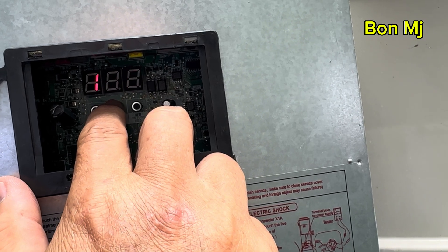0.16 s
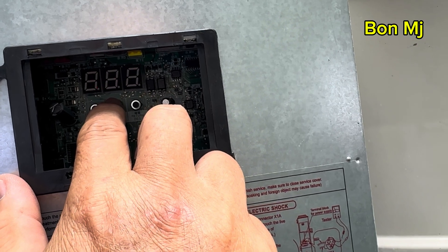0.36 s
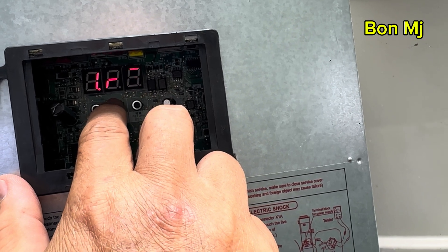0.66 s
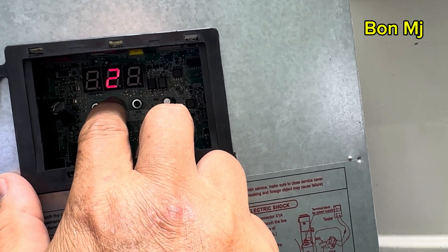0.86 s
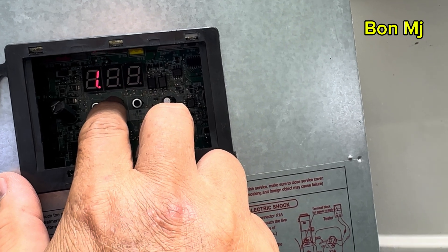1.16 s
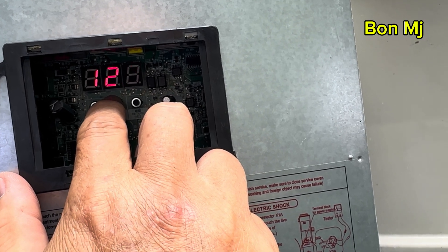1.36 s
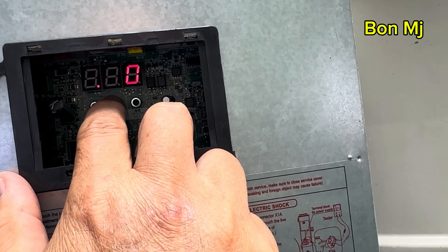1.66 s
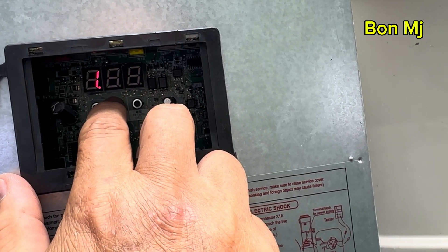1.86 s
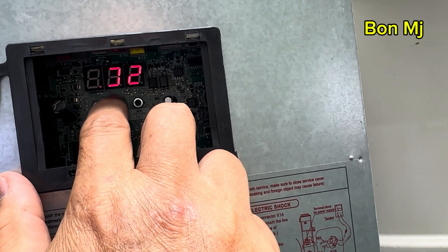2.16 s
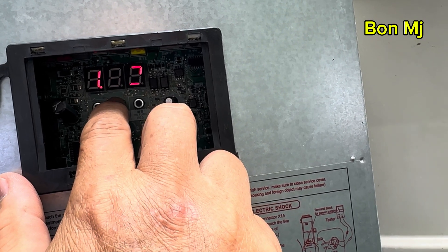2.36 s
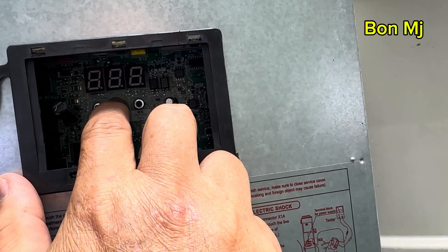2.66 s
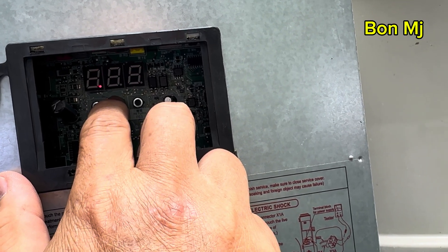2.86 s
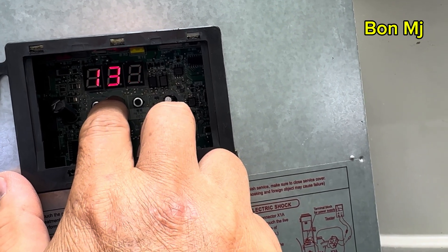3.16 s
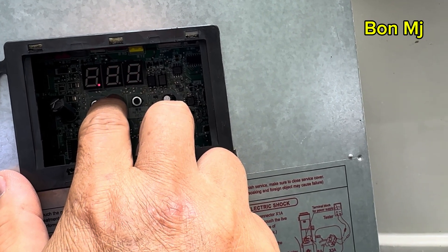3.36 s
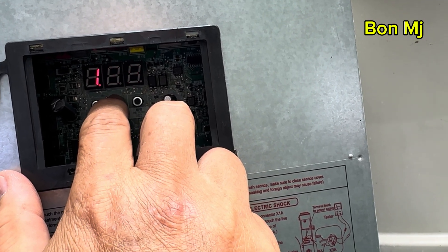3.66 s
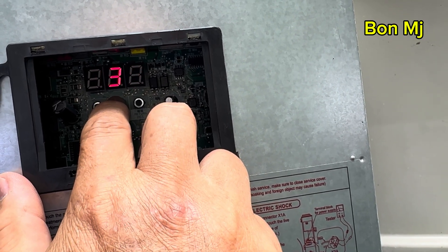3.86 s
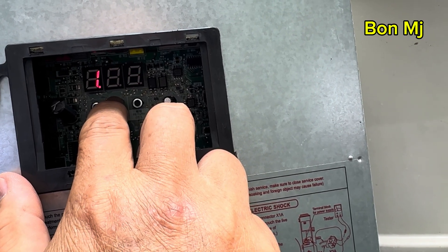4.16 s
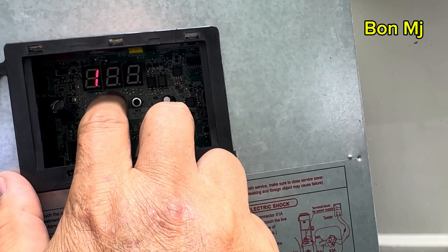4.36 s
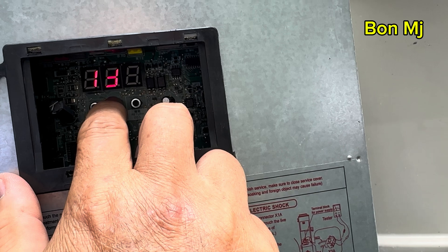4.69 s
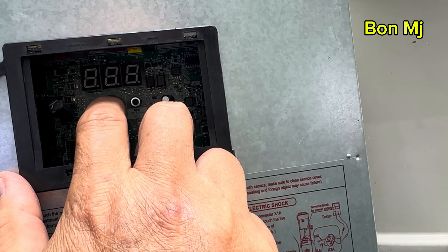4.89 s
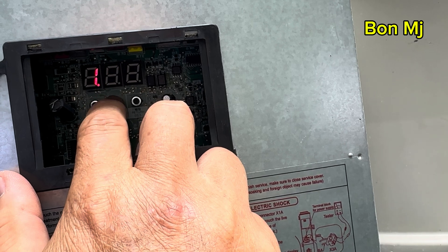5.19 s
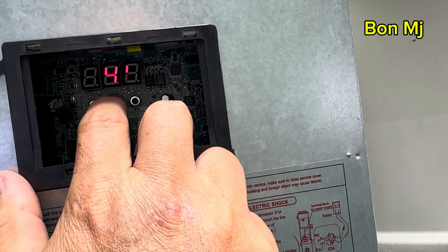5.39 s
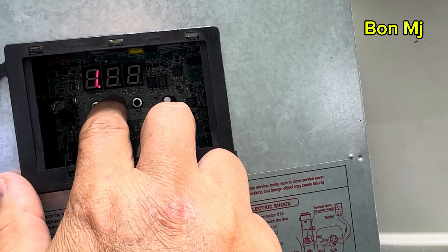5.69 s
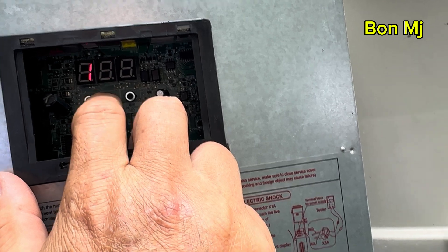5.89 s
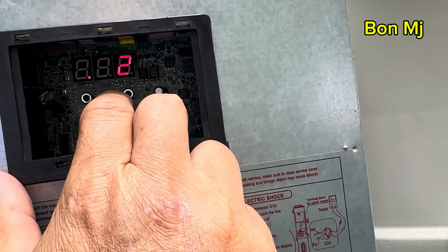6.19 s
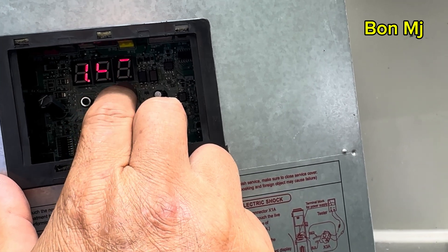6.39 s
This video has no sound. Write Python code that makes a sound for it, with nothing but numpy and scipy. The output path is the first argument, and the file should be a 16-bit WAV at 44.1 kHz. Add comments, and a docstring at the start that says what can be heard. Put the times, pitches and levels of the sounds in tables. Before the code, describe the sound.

Outdoors, close beside the metal casing of a large air conditioner, a deep compressor drone and low rush of air run without pause. From about one second the fan's blade tone swells in three long pulsing throbs, the last held to the end. Very faintly on top, an inverter whines and thin whistles slide downward again and again. Soft low thumps come near two and six seconds.

```python
"""Outdoors, a stereo pair of microphones stands close to the sheet-metal side of a large air conditioner.
From the first moment filtered noise makes the rush of air, and summed sines the fan, hums and compressors.
An inverter whines very high in a band of hiss, over a faint choke; thin whistles already slide down, and
return again and again between puffs of fine hiss. From about 1.2 s the blade tone swells in three long
throbs, the last held to the end; near 2 s and again near 6 s comes a soft low thump."""
import sys
import numpy as np
from scipy import signal
from scipy.fft import rfft, irfft
from scipy.io import wavfile

SR = 44100
rng = np.random.default_rng(int(sys.argv[2]) if len(sys.argv) > 2 else 0)


def inscribe(sig):
    """Save sig as 16-bit PCM at rate SR to the path in sys.argv[1].

    A 1-D sig is mono; a 2-D sig holds one channel per row.
    Samples are clipped to [-1, 1] before scaling.
    """
    pcm = np.round(np.clip(np.atleast_2d(sig).T, -1, 1) * 32767)
    wavfile.write(sys.argv[1], SR, pcm.astype(np.int16))


N = 288414
TIME = np.arange(N) / SR  # seconds
FREQS = np.maximum(np.fft.rfftfreq(N, 1 / SR), 1)  # Hz, kept above zero for the logarithms


def from_db(db):
    """Decibels to amplitude gain."""
    return np.exp(np.asarray(db) * (np.log(10) / 20))


def over_hz(points):
    """A spectrum's points joined on a log-frequency axis."""
    hz, value = np.transpose(points)
    return np.interp(np.log(FREQS), np.log(hz), value)


def white():
    """Spectrum of white noise with unit power per Hz."""
    return rfft(rng.standard_normal(N)) * np.sqrt(SR / 2)


def drift(rate, at=TIME):
    """Random wander of spread about 1, with `rate` new values a second, read at the given times."""
    knots = rng.standard_normal(1024)
    wander = np.interp(at * rate, np.arange(len(knots)), knots)
    return wander * np.sqrt(3 / 2)  # joining the knots by lines had shrunk the spread


def panned(left, right, side_db):
    """A stereo pair with the left raised by side_db, at equal total power."""
    ratio = from_db(side_db)
    return np.array([left * ratio, right]) * np.sqrt(2 / (1 + ratio ** 2))


def turning(hz):
    """Angle in radians of something that turns at this rate, from a random start."""
    return 2 * np.pi * (np.cumsum(hz * np.ones(N)) / SR + rng.random())


def tone(angle, db, side_db, lead):
    """A stereo sine of nominal rms level db; the right microphone leads by `lead` radians."""
    angle = np.float32(angle % (2 * np.pi) + 2 * np.pi * rng.random())
    # every tone is trimmed by about a decibel, the left a little more
    mics = np.float32(np.sqrt(2) * panned(0.84, 0.92, side_db))[:, None]
    return mics * np.float32(from_db(db)) * np.sin(angle + np.float32([[0], [lead]]))


def swell(start, length, edge_s):
    """Gain that rises, holds and falls in straight lines."""
    return np.clip(np.minimum(TIME - start, start + length - TIME) / edge_s, 0, 1)


# The rush of air before the cabinet colours it. Each row: frequency in Hz, level in dB per Hz.
AIR_SPECTRUM = [(18, -72), (32, -60.5), (46, -46.5), (72, -44), (125, -51.5), (340, -57), (640, -62),
                (1150, -71.5), (1600, -78.5), (2500, -85.5), (5000, -91), (6400, -96), (8600, -92.5),
                (9300, -114), (14500, -132)]
# Cabinet resonances that colour the rush. Each row: frequency in Hz, width in Hz, rise in dB.
CABINET_RESONANCES = [(397, 38, 1.5), (447, 34, -1.5), (575, 97, 3.5), (789, 63, 3), (975, 136, 4),
                      (1382, 150, 3.5), (2004, 560, 5), (3260, 480, 3), (4000, 150, 4), (5900, 300, 3.5)]
# How alike the rush is at the two microphones. Each row: frequency in Hz, likeness 0-1.
MIC_LIKENESS = [(30, 1), (100, 0.75), (340, 0.99), (410, 0.67), (495, 0.077), (580, 0.53), (690, .18),
                (800, 0.56), (870, 0.25), (1100, 0.87), (1320, .35), (1480, 0.51), (2100, .62),
                (2260, 0.23), (2600, 0.6), (4200, 0.62), (5900, 0.24), (6500, 1), (9000, 0.28)]
# Balance of the rush. Each row: frequency in Hz, left over right in dB.
MIC_BALANCE = [(40, 4.5), (80, -3), (260, -2), (420, -1.2), (780, -7), (960, -5), (1150, -0.5), (1450, -4),
               (5400, -5.5), (6800, 0)]
# Phase of the rush. Each row: frequency in Hz, lead of the right microphone in radians.
MIC_LEAD = [(45, 1.2), (90, -0.14), (390, 0.13), (480, 1.27), (580, .6), (690, 1.5), (760, -0.55),
            (950, -0.84), (1060, 1.02), (1200, 1.83), (1550, 0.5), (2100, 0.25), (2500, -1.3), (3000, 0.63),
            (4200, 1), (5300, .5), (5900, -0.6), (6500, 1)]


def air(rumble_hz=170, flutter_db=0.29):
    """Turbulent air coloured by the cabinet; its low rumble swells and sinks, the rest flutters slightly."""
    level_db = over_hz(AIR_SPECTRUM)
    for hz, width, rise_db in CABINET_RESONANCES:
        level_db = level_db + rise_db / (1 + (2 * (FREQS - hz) / width) ** 2)
    alike = np.clip(over_hz(MIC_LIKENESS), 0, 1)
    left = white()
    right = alike * left + np.sqrt(1 - alike ** 2) * white()
    right = right * np.exp(1j * over_hz(MIC_LEAD))
    rush = from_db(level_db) * panned(left, right, over_hz(MIC_BALANCE))
    low = 1 / (1 + (FREQS / rumble_hz) ** 4)
    rumble = irfft(rush * low, N) * from_db(rumble_gain_db())
    upper = irfft(rush * (1 - low), N) * from_db(flutter_db * drift(12))
    return rumble + upper


# Swells of the low rumble. Each row: peak time in seconds, build-up and dying time in seconds, rise in dB.
RUMBLE_SWELLS = [(.38, 0.26, 5), (2.2, 0.2, 2.5), (2.8, 0.092, 4), (3.55, .15, 1.5), (4.0, 0.12, 4),
                 (5.37, .12, 3), (5.87, 0.059, 7), (6.35, 0.12, 3.5)]
RUMBLE_DB, RUMBLE_GROWTH_DB_PER_S = -2, 0.6


def rumble_gain_db():
    """Gain of the rumble in dB: a slow build with rounded swells."""
    swells = sum(db * np.exp(-((TIME - s) / build) ** 2) for s, build, db in RUMBLE_SWELLS)
    return RUMBLE_DB + RUMBLE_GROWTH_DB_PER_S * TIME + swells


BLADE_HZ, BLADE_SAG_HZ_PER_S = 74.15, 0.38  # the main fan slows very slightly
BEAT_HZ, BEAT_AT_S, BEAT_DB = 7.8, 2.08, 2.5  # quick pulsing: rate, time of one crest, depth
# Other steady hums of the unit. Each row: frequency in Hz, nominal level in dB, left over right in dB.
UNIT_HUMS = [(64.1, -38, -1), (143, -42, -4), (185.8, -40, -1), (300.3, -38.3, -2), (344, -48, -2),
             (952, -59, -2), (973.7, -60, -2)]


def fan(side_db=-0.5):
    """The blade tone swells, pulses and fades among the unit's other hums; all waver by about a decibel."""
    blade_hz = BLADE_HZ - BLADE_SAG_HZ_PER_S * TIME
    pulsing = BEAT_DB * np.cos(2 * np.pi * BEAT_HZ * (TIME - BEAT_AT_S))
    blades = tone(turning(blade_hz), throbs() + pulsing + drift(6), side_db, 0)
    hums = sum(tone(turning(hz), db + drift(2.56), side, 0) for hz, db, side in UNIT_HUMS)
    return blades + hums


# Throbs of the blade tone. Each row: time of full strength in seconds, hold in seconds, rise in dB.
BLADE_THROBS = [(1.405, 0.85, 14.5), (3.375, 0.85, 9.5), (5.65, 1, 9.5)]
BLADE_DB = -35.5  # between throbs, before pulsing and waver
THROB_ATTACK_S, THROB_RELEASE_S = 0.21, 0.154


def throbs():
    """Level of the blade tone in dB: each throb rises, holds and falls back."""
    level_db = BLADE_DB
    for full, hold, rise_db in BLADE_THROBS:
        corners = [full - THROB_ATTACK_S, full, full + hold, full + hold + THROB_RELEASE_S]
        level_db = level_db + np.interp(TIME, corners, [0, rise_db, rise_db, 0])
    return level_db


SLOW_SHAFT_HZ = 26.51
# The slow compressor's drone. Each row: multiple of the shaft rate, nominal level in dB,
# left over right in dB, lead of the right microphone in radians.
SLOW_LINES = [(2, -29.3, 0, 1.2), (3, -35, -3, .1), (4, -27.7, -3, .3), (5, -42, -3, .4), (6, -40.5, -2, 0),
              (8, -34.5, -3, .2), (9, -45, -5, .1), (10, -45, -3, .4), (11, -46, -3, 0),
              (12, -37.5, -2, .1), (14, -49.5, -2, 0), (17, -55, -1, .9), (19, -54, -7, -1.9),
              (36, -57, -6, -1.3)]


def slow_compressor(wander=0.0011, waver_db=0.25):
    """Each compression stroke shakes the cabinet: a drone on multiples of the shaft rate."""
    shaft = turning(SLOW_SHAFT_HZ * (1 + wander * drift(3.044)))
    return sum(tone(round(k) * shaft, db + waver_db * drift(3.7), side, lead)
               for k, db, side, lead in SLOW_LINES)


FAST_SHAFT_HZ = 51.253
# The fast compressor singing through the panels. Each row: multiple of the shaft rate, nominal level in dB.
FAST_LINES = [(20, -63), (26, -69), (38, -72), (42, -73), (60, -76), (63, -80), (66, -67), (86, -82),
              (96, -75), (100, -78), (105, -82), (107, -79), (108, -80), (109, -80), (112, -78), (124, -79),
              (130, -83)]


def fast_compressor(side_db=-5, lead=0.54, buzz_db=-70, buzz_hz=4500, ring_s=0.011):
    """Only high multiples of this shaft get out: a few steady lines over a faint valve buzz."""
    shaft = turning(FAST_SHAFT_HZ)
    lines = sum(tone(round(k) * shaft, db + drift(8.6), side_db, lead) for k, db in FAST_LINES)
    beats = np.diff(shaft // (2 * np.pi), prepend=0)  # the valve shuts once a turn
    shell = white() * np.exp(-2 * np.log2(FREQS / buzz_hz) ** 2)
    ring = irfft(shell, N) * np.exp(-TIME / ring_s)  # the shell's short ring after each beat
    buzz = irfft(rfft(beats) * rfft(ring), N)
    buzz = from_db(buzz_db) * buzz / np.std(buzz)
    return lines + panned(buzz, buzz, side_db)


# Whistles in a lower and a higher series. Each row: start in seconds, length in seconds,
# starting pitch in Hz, level in dB to which the partials' levels are added.
WHISTLE_SLIDES = [(-.05, .44, 2976, -54.5), (.68, .56, 2989, -54.5), (.79, .46, 3031, -56),
                  (1.52, .53, 2985, -55), (2.24, .42, 3027, -54.5), (2.37, .5, 2982, -55.5),
                  (3.15, .52, 2981, -57), (3.38, .6, 3048, -56.5), (3.8, .54, 2987, -59.5),
                  (4.47, .48, 2985, -55.5), (4.55, .66, 3058, -55), (5.12, .46, 2982, -54.5),
                  (5.66, .46, 2987, -54.5), (5.77, .69, 3063, -55), (6.22, .42, 2989, -56.5)]
# Partials of a whistle. Each row: multiple of its pitch, added level in dB, left over right in dB,
# lead of the right microphone in radians.
PARTIALS = [(1, -20, 0, 0.75), (2, -17.5, -6, -1.3), (4, -3, 0, 0.52)]
# Narrow resonances that light up as a partial slides through. Each row: frequency in Hz, width in Hz,
# rise in dB.
SLIDE_RESONANCES = [(2962, 40, 12), (5903, 22, 10), (5933, 20, 8.5), (6033, 20, 11), (6069, 20, 10),
                    (11865, 30, 3), (11918, 16, 3), (12015, 24, 2), (12160, 30, 3), (12215, 40, 2)]
WHISTLE_FALL_HZ_PER_S, WHISTLE_JITTER_HZ = 92, 1.5  # of the lowest partial


def whistles(flicker_db=4.0, edge_s=0.05):
    """Each whistle slides down near 3 kHz, is loudest two octaves up and breaks into patches in the cabinet."""
    out = np.zeros((2, N))
    for start, length, hz, db in WHISTLE_SLIDES:
        gain = swell(start, length, edge_s)
        on = np.flatnonzero(gain)
        age = TIME[on] - start
        pitch = hz - WHISTLE_FALL_HZ_PER_S * age + WHISTLE_JITTER_HZ * drift(90.7, age)
        angle = 2 * np.pi * np.cumsum(pitch) / SR
        for multiple, partial_db, side_db, lead in PARTIALS:
            k = round(multiple)
            lift_db = sum(top / (1 + (2 * (k * pitch - peak) / width) ** 2)
                          for peak, width, top in SLIDE_RESONANCES)
            level_db = db + partial_db + lift_db + flicker_db * drift(32.7, age)
            mics = panned(np.sin(k * angle), np.sin(k * angle + lead), side_db)
            out[:, on] += np.sqrt(2) * gain[on] * from_db(level_db) * mics
    return cabinet_echo(out)


CABINET_T60_S, CABINET_RING_DB = 0.22, -7.5  # decay, and echo relative to the direct whistle


def cabinet_echo(x, spread=0.41):
    """Dense reflections off the panels: a sliding tone catches on one resonance after another."""
    decay = from_db(-60 * np.minimum(TIME / CABINET_T60_S, 3))
    shared, apart = rng.standard_normal((2, N)) * decay
    tail = np.array([shared + spread * apart, shared - spread * apart])[:, :SR // 2]
    tail = from_db(CABINET_RING_DB) * tail / np.sqrt(np.sum(tail ** 2) / 2)
    echo = signal.fftconvolve(x, tail, axes=1)[:, :N]
    return (x + echo) / np.hypot(1, from_db(CABINET_RING_DB))  # about the same power as without echo


WHINE_CENTRE_HZ = 11793  # twice the switching rate
# The whine's centre line and sidebands. Each row: offset from the centre in Hz, nominal level in dB.
WHINE_LINES = [(-922.5, -82), (-615, -77), (-307.5, -69.5), (-100, -70), (0, -60), (100, -71), (307.5, -65)]
# Hiss round the whine. Each row: frequency in Hz, level of its middle signal in dB per Hz.
HISS_SPECTRUM = [(9800, -135), (10900, -98), (11650, -94), (11800, -88), (11970, -90), (12150, -87.5),
                 (12400, -92), (12550, -112), (13000, -138)]
# Stereo width of that hiss. Each row: frequency in Hz, side over middle as an amplitude ratio.
HISS_WIDTH = [(11000, 1), (11600, 0.65), (12000, .25), (12300, .03)]


def inverter(waver_db=2.1, lead=0.75, hiss_flicker_db=1.0):
    """Switched current makes the motor windings whine, in a narrow band of hiss."""
    lines = sum(tone(turning(WHINE_CENTRE_HZ + offset), db + waver_db * drift(4.7), 0, lead)
                for offset, db in WHINE_LINES)
    spectra = np.array([white(), white() * over_hz(HISS_WIDTH)])
    mid, side = irfft(spectra * from_db(over_hz(HISS_SPECTRUM)), N)
    hiss = np.array([mid + side, mid - side]) * from_db(hiss_flicker_db * drift(6.1))
    return lines + hiss


# Puffs of hiss. Each row: start in seconds, length in seconds, rms level in dB at full swell before flutter.
HISS_PUFFS = [(-.15, 0.64, -59), (1.2, .5, -62.5), (2.53, 0.38, -65), (3.86, 0.33, -67), (5.12, .28, -65),
              (6.38, .3, -64)]


def hiss_puffs(centre_hz=12450, width_hz=480, edge_s=0.11, flutter_db=3.0):
    """A narrow, very high hiss comes in fluttering puffs at a nearly even pace, alike on both sides."""
    band = irfft(white() * np.exp(-(2 * (FREQS - centre_hz) / width_hz) ** 2 / 2), N)
    puffs = sum(from_db(db) * swell(start, length, edge_s) for start, length, db in HISS_PUFFS)
    return band / np.std(band) * puffs * from_db(flutter_db * drift(40))


# Low thumps. Each row: peak time in seconds, peak level in dB before panning.
LOW_THUMPS = [(2.066, -16), (5.888, -19)]
THUMP_HZ, THUMP_SWING_S = 73, 0.014


def thumps(side_db=-2):
    """Soft thumps, each a few low swings that build up and die away."""
    out = 0
    for s, db in LOW_THUMPS:
        age = TIME - s
        envelope = np.exp(-(age / THUMP_SWING_S) ** 2)
        out = out + from_db(db) * envelope * np.cos(2 * np.pi * THUMP_HZ * age)
    return panned(out, out, side_db)


RIPPLE_HZ = 100.08
# Faint ringing of the rectifier's choke. Each row: multiple of the mains ripple, nominal level in dB.
CHOKE_LINES = [(67, -80), (70, -83), (71, -80), (76, -81), (80, -84), (84, -83), (85, -80), (88, -81)]


def choke(side_db=-2, lead=0.4):
    """Mains ripple rings faintly in the rectifier's choke."""
    ripple = turning(RIPPLE_HZ)
    return sum(tone(k * ripple, db, side_db, lead) for k, db in CHOKE_LINES)


def scene():
    """The whole unit in the open air, every source summed without an echo of the surroundings."""
    machine = air() + fan() + slow_compressor() + fast_compressor()
    high = whistles() + inverter() + hiss_puffs()
    return machine + high + thumps() + choke()


CUTOFF_HZ = 15800  # at least 70 dB down from here up


def record(dry):
    """The microphones' top end is cut by a steep low-pass filter."""
    low_pass = signal.cheby2(12, 70, CUTOFF_HZ, fs=SR, output="sos")
    return signal.sosfilt(low_pass, dry)


dry = scene()
out = record(dry)
inscribe(out)
```